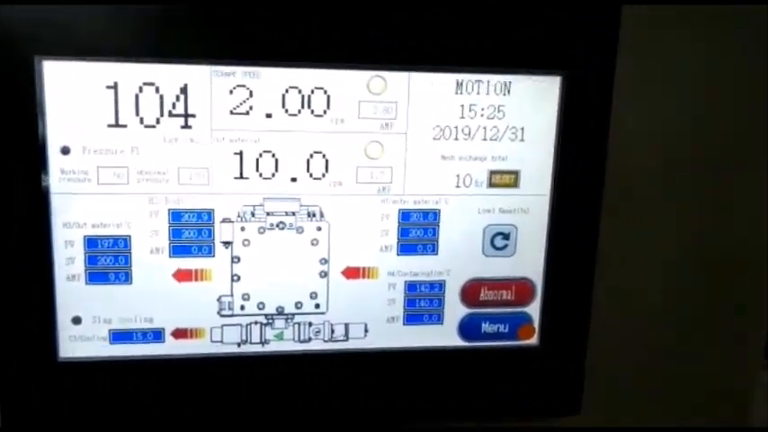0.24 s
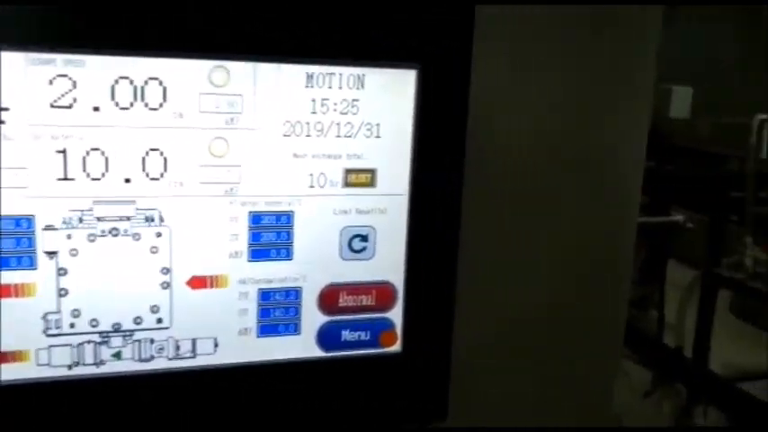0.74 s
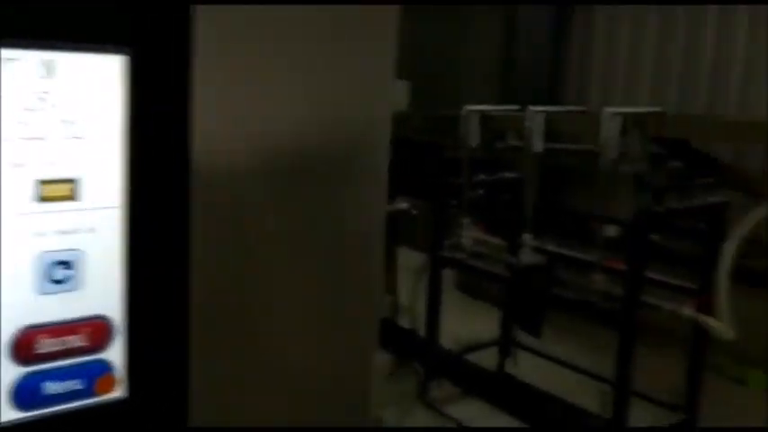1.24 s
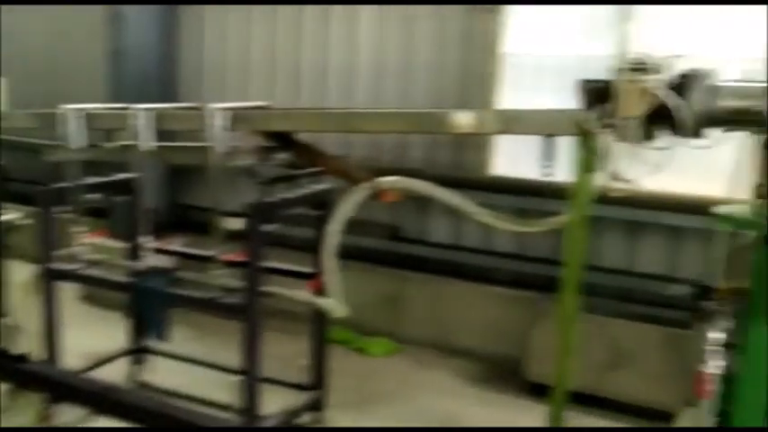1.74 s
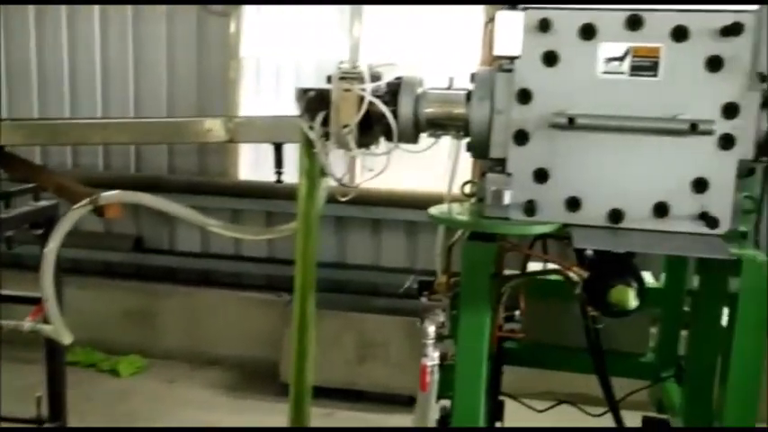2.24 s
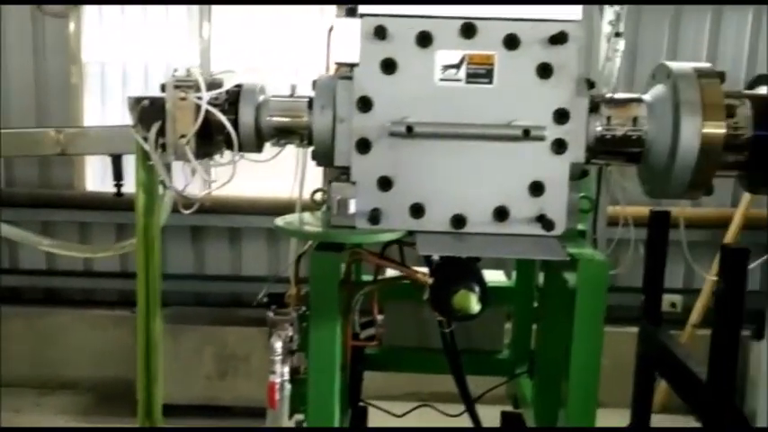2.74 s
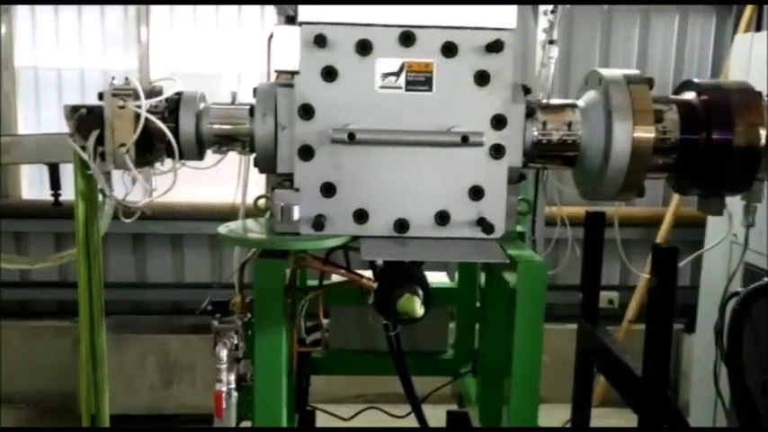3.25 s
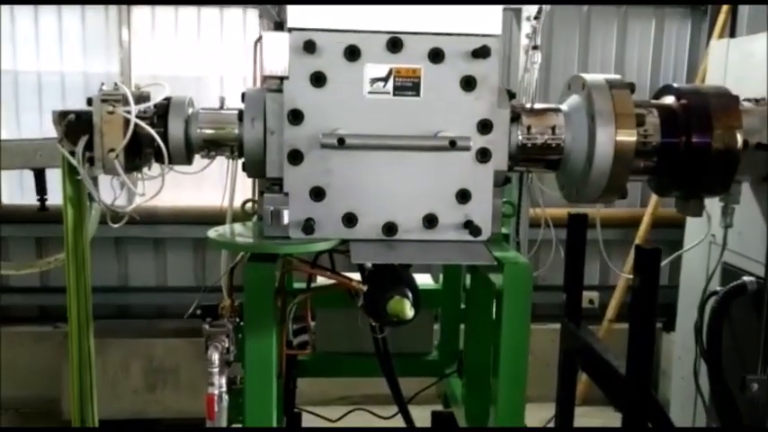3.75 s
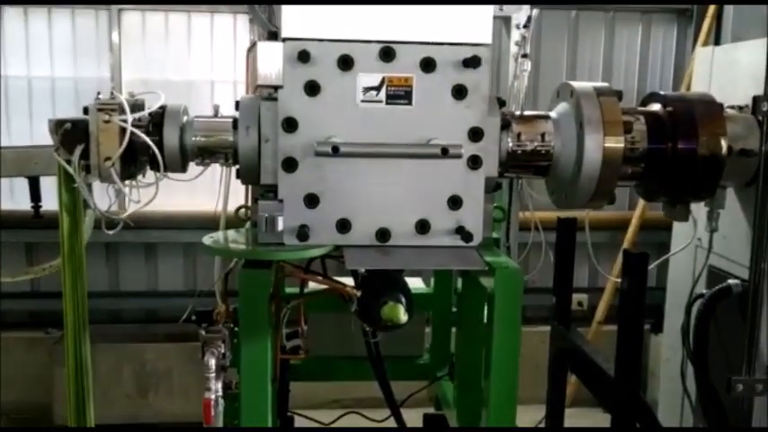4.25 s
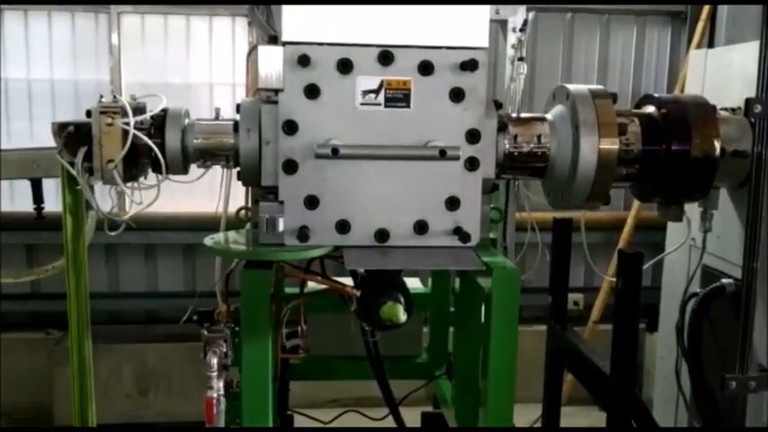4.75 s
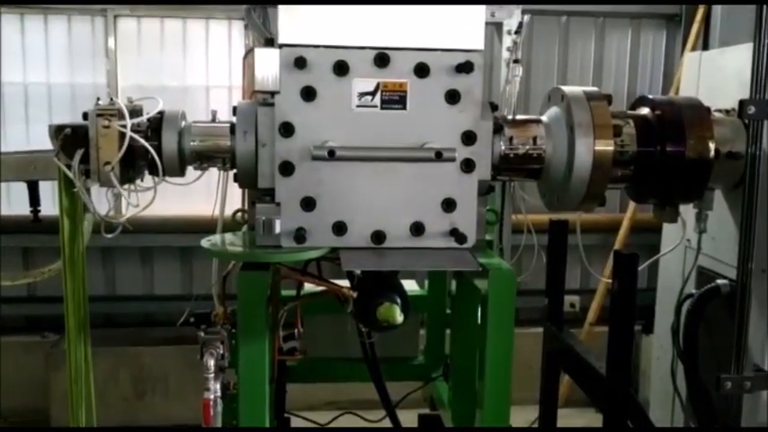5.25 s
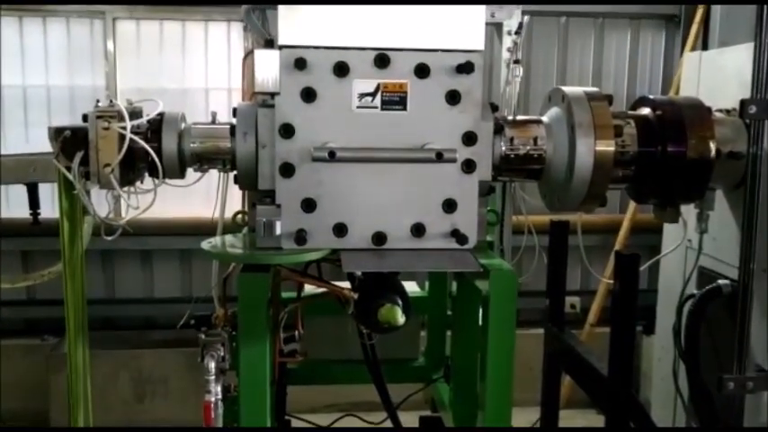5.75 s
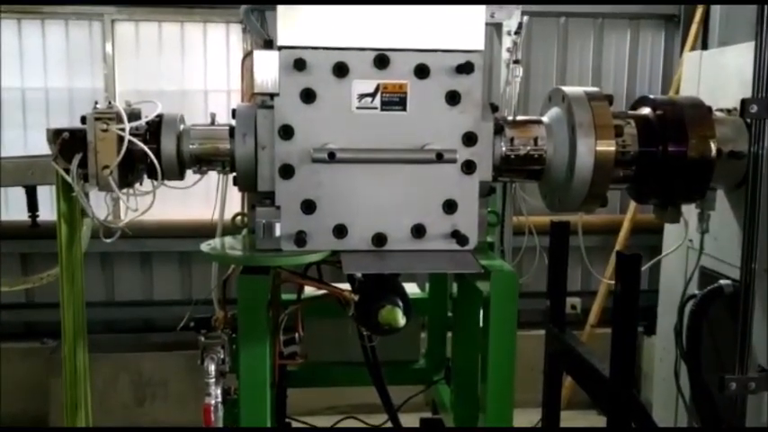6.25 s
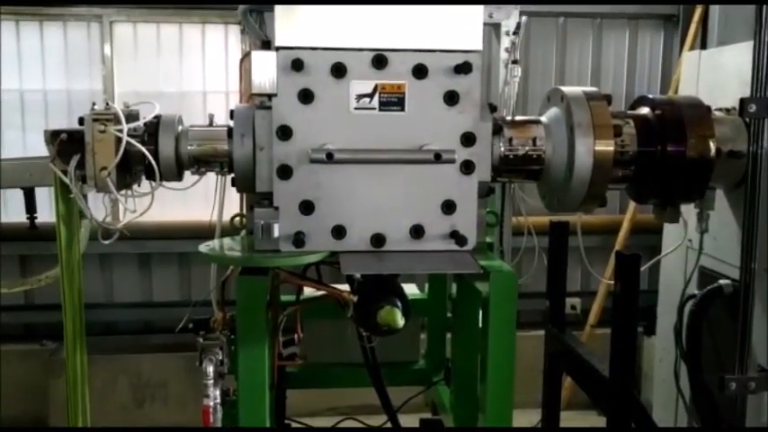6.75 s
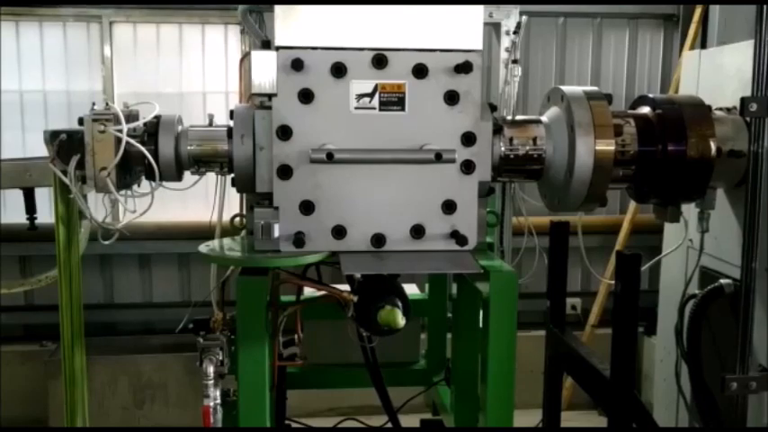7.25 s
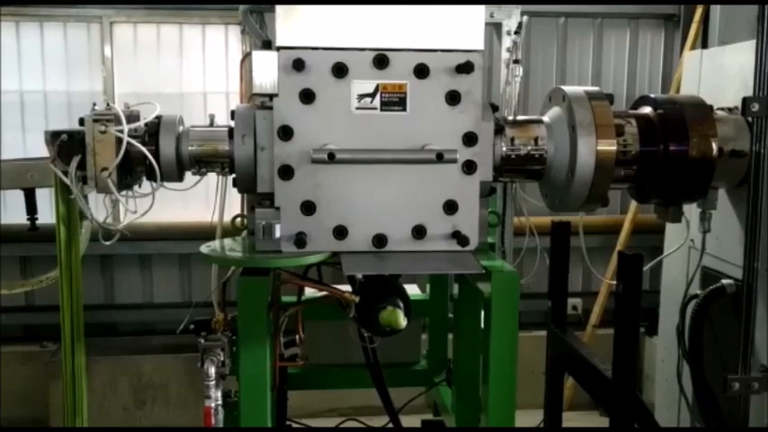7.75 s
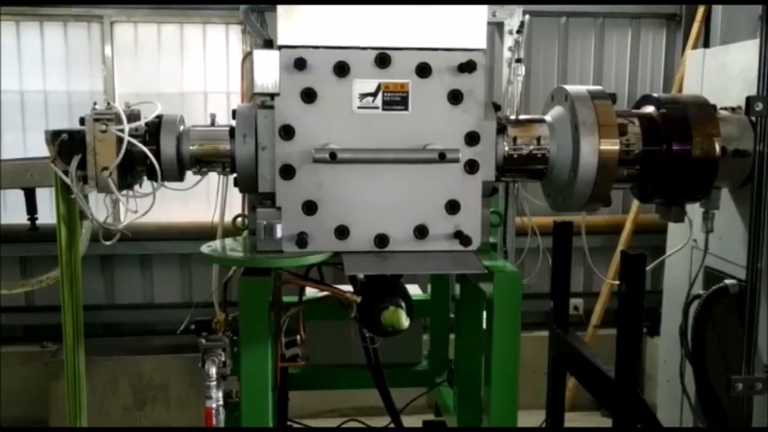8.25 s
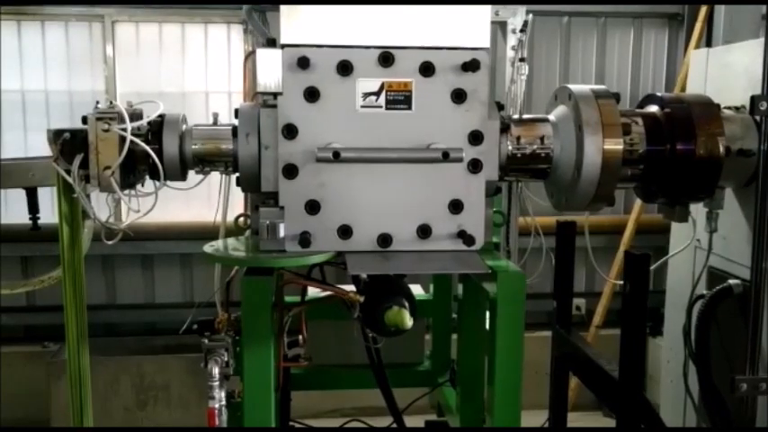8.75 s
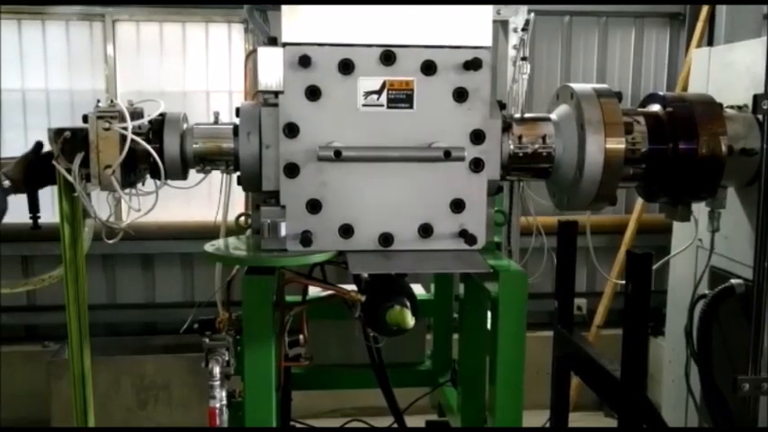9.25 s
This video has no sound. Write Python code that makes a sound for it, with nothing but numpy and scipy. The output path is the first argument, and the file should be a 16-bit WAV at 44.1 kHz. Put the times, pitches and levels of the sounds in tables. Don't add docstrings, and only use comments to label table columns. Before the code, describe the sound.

Dense, steady machine noise from a large screw machine, heard on a handheld stereo phone with thin bass and grainy, watery treble. A shrill electronic whine drifts slightly higher while gear tones flutter and fade separately in each ear. Broad fan and pump roar fills the reverberant hall. A soft air puff comes at about three seconds, another gear whine starts near six, then a sudden cut to silence.

```python
import sys
import numpy as np
from scipy import signal
from scipy.fft import rfft, irfft
from scipy.io import wavfile
from scipy.ndimage import uniform_filter1d

SR = 44100
rng = np.random.default_rng(int(sys.argv[2]) if len(sys.argv) > 2 else 0)


def to_wav(s):
    ch = np.atleast_2d(s).T
    pcm = np.round(np.clip(ch, -1, 1) * 32767)
    wavfile.write(sys.argv[1], SR, pcm.astype(np.int16))


def level_to_linear(level):
    exponent = np.asarray(level, float) / 20
    return 10 ** exponent


N = 419391

# left level in dB, right level in dB, left lead in rad.
HUM_DB_RAD = [
    (-36.5, -33.5, 1.37),
    (-35, -29, 1.18),
]
# time in s, left level in dB, right level in dB, left lead in rad.
MESH_FADES = [(0.0, -27.5, -31, -0.8), (0.7, -31, -42, 0), (1.0, -32.5, -28.5, -1), (1.36, -29, -26, -1),
              (1.55, -39, -33, -2), (1.8, -42, -25.5, -1.5), (1.97, -29, -31, 0.5), (2.12, -40, -41, 4),
              (2.4, -30, -43, -1.8), (3.15, -38, -30, -2.5), (4.0, -28, -30.5, -2.5), (5.0, -39, -41, -7),
              (6.0, -34.5, -31.5, -5.6), (6.4, -34.5, -33, -4), (7.0, -31, -42, -8), (8.25, -34, -25, -3.5),
              (8.75, -36, -31, -9), (9.5, -44, -27, -5)]
# time in s, frequency in Hz.
SECOND_GEAR_HZ = [
    (5.88, 1990),
    (6.0, 2065),
    (6.15, 2094),
    (9.6, 2094),
]
# time in s, left level in dB, right level in dB.
SECOND_GEAR_DB = [
    (5.85, -66, -47),
    (5.95, -39, -34),
    (6.3, -34, -45),
    (7.25, -34, -30),
    (8.0, -29, -33.5),
    (8.75, -49, -28.5),
    (9.5, -20, -34),
]
# frequency in Hz, level in dB, blur in Hz.
FAINT_ORDERS = [(57, -50, 6), (77, -49, 6), (153, -39, 4), (176, -45, 5), (230, -38, 4), (270, -42, 4),
                (345, -43, 6), (405, -47, 3), (633, -49, 2), (692, -46, 3), (982, -48, 2), (1036, -48, 2),
                (1093, -53, 2), (1308, -52, 3), (1324, -52, 2), (1381, -51, 2),
                (2299, -48, 3), (2321, -45, 8), (3930, -56, 2), (3970, -55, 2), (4000, -55, 2),
               (4029, -55, 2), (4070, -56, 2), (4500, -57, 2), (7978, -64, 3), (8018, -64, 3),
               (9355, -66, 20), (11929, -66, 4), (11967, -63, 4), (12029, -68, 4), (12067, -67, 4)]

# time in s, switching rate in Hz, supply rate in Hz, slot ripple in Hz.
DRIVE_HZ = [(0.0, 3084.2, 55.0, 392.4), (0.5, 3102.5, 55.0, 392.8), (1.0, 3113.1, 55.2, 392.8),
            (3.5, 3152.5, 54.7, 391.6), (4.0, 3159.4, 54.0, 386.0), (4.5, 3167.1, 51.7, 370.1),
            (5.5, 3182.7, 47.2, 322.2), (6.0, 3192.9, 49.4, 299.6), (6.5, 3204.8, 48.0, 273.2),
            (7.0, 3221.4, 48.4, 241.3), (8.0, 3254.6, 49.3, 215.8), (9.0, 3292.1, 49.8, 195.9),
            (9.5, 3307.1, 48.8, 188.3)]
# multiple of ripple rate, level in dB.
RIPPLE_LINES = [(1.0, -44), (1.093, -39), (1.16, -44)]
# multiples of supply, ripple and wobble, lower and upper level in dB.
SWITCHING_SIDEBANDS = [(1, 0, -1, -42, -41), (1, 0, 1, -43, -42), (3, 0, 0, -40, -43), (3, 0, -1, -47, -53),
                       (3, 0, 1, -51, -53), (5, 0, 0, -48, -54), (-1, 1, 0, -39, -42), (1, 1, 0, -38, -44),
                       (3, 1, 0, -46, -58), (-3, 1, 0, -49, -55)]
# multiples of ripple and wobble, lower and upper level in dB.
OCTAVE_SIDEBANDS = [(0, 0, -54, -66), (0, 1, -60, -57), (1, -1, -61, -59)]
# time in s, gain in dB.
OCTAVE_SWELL_DB = [(0, 4.5), (.55, 6), (1.1, -1.5), (4.2, 1), (4.8, 6), (5.3, 2.5), (6.2, -1.5), (9.5, -3)]
# time in s, half length in s, left dB, right dB, left lead in rad.
LOWER_SWELLS = [(0.504, 0.17, -22, -24.5, 2), (1.013, 0.3, -21, -20.5, 1), (1.55, 0.11, -33, -23, 3.5),
                (2.063, 0.091, -28, -20.5, 1), (2.58, 0.15, -20, -40, -4), (2.826, 0.11, -26, -27, 0.4),
                (3.5, 0.25, -35, -32, 2.5), (4.15, 0.37, -29, -32, 3.5), (4.5, 0.084, -29.5, -28, -2.5),
                (5.653, 0.27, -24, -29.5, 1.46), (6.45, 0.21, -29, -29, 3.5), (7.25, 0.19, -30.5, -29, 1.7)]
# time in s, half length in s, left dB, right dB, left lead in rad.
UPPER_SWELLS = [(.37, 0.076, -33, -25, 2.5), (.85, 0.4, -30, -34, 0), (1.65, 0.22, -27.5, -35, 1.5),
                (2.4, 0.11, -39, -38, -1.5), (4.0, .13, -25, -29, -2.5), (4.65, 0.25, -26.5, -29.5, 0.8),
                (5.1, 0.2, -31.5, -30.5, 1), (5.5, 0.21, -36, -28, 2), (6.55, .28, -37, -29, 0.6),
                (7.2, 0.17, -30, -33, 1.5), (6.95, 0.17, -34, -34, 1.8), (7.7, 0.12, -40, -55, 0.7),
                (8.6, 0.32, -37, -48, -0.5), (9.3, .2, -37.5, -45, 1.5)]

# frequency in Hz, density in dB per Hz.
ROAR_SPECTRUM = [(20, -30), (45, -5), (70, -6), (160, 2), (400, -0.5), (520, -5.5), (760, -2.5), (1200, -8),
                 (1900, -4), (2400, -0.5), (3300, -7), (4000, -12), (5000, -17), (14500, -45)]
# frequency in Hz, density in dB per Hz.
HISS_SPECTRUM = [(3000, -10), (5000, -8.5), (6400, 0), (8400, -10), (9300, -2.5), (10500, -5.5),
                 (12000, -3.5), (13500, -8), (14500, -15)]
# gain on facing machine in dB, random swell in dB rms, fastest swell in Hz.
ROAR_LAYERS = [
    (1, 2, 2),
    (0, .6, 3),
    (.9, .2, 4),
    (2, .15, 4),
]
# time in s, half length in s, gain in dB.
VENT_PUFF = (3.1, .085, 4.5)
# time in s, half length in s, gain in dB.
FLOOR_THRUM = (6.1, 0.77, 5.4)

# frequency in Hz, correlation 0-1.
MIC_LIKENESS = [(60, 0.9), (130, 0.94), (280, 0.95), (620, 0.62), (1300, 0.38), (2500, 0.26), (6000, 0.036),
                (14000, .05)]
# frequency in Hz, phase in rad.
LEFT_LEAD_RAD = [(20, 0), (300, .1), (690, .3), (1120, 2), (1640, 3)]
# frequency in Hz, left minus right in dB.
LEFT_TILT_DB = [(60, -2.5), (110, 0.5), (200, -3), (370, -1), (670, -2), (1230, -3), (2240, -2.5),
                (4100, 0), (7490, -4.5), (13700, -7)]
# time in s, facing 0-1.
FACING_MACHINE = [
    (0, 0),
    (1.12, .03),
    (1.33, .3),
    (2.15, .4),
    (2.8, 1),
    (9.5, 1),
]
# frequency in Hz, gain in dB.
CASE_DB = [(15, -29), (30, -19), (48, -0.5), (6500, 1.5), (7000, -0.5), (7700, -2), (8300, 3.5), (8900, 2)]
# frequency in Hz, threshold against usual level in dB.
THIN_DB = [(4300, -16), (5000, -9), (6600, -11), (7000, 4), (7600, 6.5), (8400, 4.5), (8900, -10),
           (12500, -7), (13500, -3), (14300, 3)]


def gears():
    facing, = curves(FACING_MACHINE)
    hum = [cabinet + (machine - cabinet) * facing for cabinet, machine in zip(*HUM_DB_RAD)]
    second_hz, = curves(SECOND_GEAR_HZ)
    second_lead_rad = 0.88
    tones = gear(*hum, 921.2, flutter=0.15)
    tones = tones + gear(*curves(MESH_FADES), 2073, flutter=0.33)
    tones = tones + gear(*curves(SECOND_GEAR_DB), second_lead_rad, second_hz, flutter=0.38)
    fan_db = np.maximum(-35.5 - 45 * facing, -44.5)
    fan = faint(654, fan_db, 2, steady=3.5)
    orders = sum(faint(*row) for row in FAINT_ORDERS)
    return tones.real + fan + orders


def gear(left_db, right_db, lead_rad, hz, flutter, blur_hz=15):
    left = level_to_linear(left_db) * np.exp(1j * lead_rad)
    gain = np.array([left, level_to_linear(right_db) + 0j]).reshape(2, -1)
    reflections = 1 + flutter * fading(blur_hz, 0.25, 0)
    return gain * turn(hz) * reflections / np.hypot(1, flutter)


def whine():
    switching, supply, ripple = curves(DRIVE_HZ)
    wobble = 0.093 * ripple
    facing, = curves(FACING_MACHINE)
    octave_db, = curves(OCTAVE_SWELL_DB)
    load_db = 10.5 * np.log2(ripple / ripple[0])
    pair_db = -31 - 1.18 * np.arange(N) / SR
    shield_db = 4 * (facing - 1)
    out = np.zeros((2, N))
    for multiple, db in RIPPLE_LINES:
        out += faint(multiple * ripple, db + 3 * load_db + shield_db, 3, steady=3.0)
    for sign, rows in ((-1, LOWER_SWELLS), (1, UPPER_SWELLS)):
        pair_hz = switching + sign * supply
        out += swells(rows, pair_hz)
        out += faint(pair_hz, pair_db, 6.5, steady=0.55)
        for a, b, c, *level_db in SWITCHING_SIDEBANDS:
            offset = a * supply + b * ripple + c * wobble
            db = level_db[sign > 0] + (b + 1) / 2 * load_db
            out += faint(switching + sign * offset, db, 6, steady=0.6)
        for b, c, *level_db in OCTAVE_SIDEBANDS:
            offset = b * ripple + c * wobble
            out += faint(2 * switching + sign * offset, level_db[sign > 0] + octave_db, 9, steady=1.6)
    return out


def swells(rows, hz):
    s, half_s, left_db, right_db, lead_rad = np.transpose(rows)[..., None]
    t = np.arange(0, N / SR + 0.01, 0.01)
    bumps = np.exp(-((t - s) / half_s) ** 2)
    left = (level_to_linear(left_db) * np.exp(1j * lead_rad) * bumps).sum(0)
    right = (level_to_linear(right_db) * bumps).sum(0)
    gain = np.array([np.interp(np.arange(N) / SR, t, side) for side in (left, right)])
    return (gain * gear(0, 0, 0, hz, flutter=0.4, blur_hz=16)).real


def faint(hz, db, blur_hz, steady=0.97):
    middle_hz = np.mean(hz)
    side = level_to_linear(read(LEFT_TILT_DB, middle_hz) / 2 * np.array([[1], [-1]]))
    same = np.clip(read(MIC_LIKENESS, middle_hz), 0, 1)
    return level_to_linear(db) * side * (turn(hz) * fading(blur_hz, same, steady)).real


def turn(hz):
    cycles = np.cumsum(hz * np.ones(N)) / SR + rng.random()
    angle = (2 * np.pi * (cycles % 1)).astype(np.float32)
    return np.sqrt(2) * (np.cos(angle) + 1j * np.sin(angle))


def fading(blur_hz, same, steady):
    step = 256
    z = rng.standard_normal((2, N // step + 2, 2)) @ [1, 1j]
    r = np.exp(-np.pi * blur_hz * step / SR)
    z = evened(signal.lfilter([1], [1, -2 * r, r * r], z))
    z = z + steady * np.exp(2j * np.pi * rng.random((2, 1)))
    z[1] = same * z[0] + np.sqrt(1 - same ** 2) * z[1]
    z = evened(z)[..., None]
    smooth = z[:, :-1] + np.diff(z, axis=1) * np.arange(step) / step
    return smooth.reshape(2, -1)[:, :N]


def roar():
    size, hop = 1024, 256
    frames, hz = N // hop + 5, np.fft.rfftfreq(size, 1 / SR)
    a, b, c, d, patches = rng.standard_normal((frames, len(hz), 5)).T
    patches = evened(uniform_filter1d(uniform_filter1d(patches, 10, 0), 14, 1))

    same = np.clip(read(MIC_LIKENESS, hz), 0, 1)[:, None]
    left = a + 1j * b
    right = same * left + np.sqrt(1 - same ** 2) * (c + 1j * d)
    half_db = read(LEFT_TILT_DB, hz)[:, None] / 2
    lead = np.exp(1j * read(LEFT_LEAD_RAD, hz))[:, None]
    noise = np.array([left * level_to_linear(half_db) * lead, right * level_to_linear(-half_db)])

    t = np.arange(frames) * hop / SR
    facing, = curves(FACING_MACHINE, t)
    *body_db, hiss_db = [turn_db * facing + db * swell(t, top_hz) for turn_db, db, top_hz in ROAR_LAYERS]
    hiss_db += -46.5 + bump_db(VENT_PUFF, t)
    body_db[0] += bump_db(FLOOR_THRUM, t)
    shares = [np.interp(hz, [110, 150, 450, 560], row)
              for row in ([1, 0, 0, 0], [0, 1, 1, 0], [0, 0, 0, 1])]
    swell_db = sum(np.outer(share, db - db.mean()) for share, db in zip(shares, body_db))
    body = evened(level_to_linear(read(ROAR_SPECTRUM, hz)))[:, None] * level_to_linear(swell_db - 20.5)
    air = evened(level_to_linear(read(HISS_SPECTRUM, hz)) * (hz > 2500))[:, None] * level_to_linear(hiss_db + 7)
    field = noise * np.hypot(body, air) * level_to_linear(0.92 * patches)
    return signal.istft(field, nperseg=size, noverlap=size - hop)[1][:, :N] / np.sqrt(size)


def bump_db(event, t):
    s, half_s, db = event
    return db * np.exp(-((t - s) / half_s) ** 2)


def swell(t, top_hz):
    hz = np.geomspace(0.15, top_hz, 20)[:, None]
    sines = np.sin(2 * np.pi * (hz * t + rng.random(hz.shape)))
    return evened((sines / np.sqrt(hz)).sum(0))


def evened(x):
    return x / np.sqrt(np.mean(abs(x) ** 2) + 1e-20)


def read(points, hz):
    f, value = np.transpose(points)
    return np.interp(np.log(hz + 1), np.log(f + 1), value)


def curves(rows, t=None):
    s, *columns = np.transpose(rows)
    if t is None:
        t = np.arange(N) / SR
    return [np.interp(t, s, column) for column in columns]


def scene():
    return gears() + whine() + roar()


def case(x):
    size = 2 ** 19
    gain = level_to_linear(read(CASE_DB, np.fft.rfftfreq(size, 1 / SR)))
    return irfft(rfft(x, size) * gain)[:, :N]


def thin_bands(x):
    size, hop = 2048, 1024
    window = np.sin(np.pi * (np.arange(size) + 0.5) / size)
    hz, t, z = signal.stft(x, SR, window, size, hop)
    band = (hz // 344).astype(int)
    luck = evened(uniform_filter1d(rng.standard_normal((band.max() + 1, len(t))), 2, 1))
    usual = np.sqrt(uniform_filter1d((abs(z) ** 2).mean(2), 16))[..., None]
    threshold_db = read(THIN_DB, hz)[:, None] + 6.5 * luck[band]
    kept = abs(z) > usual * level_to_linear(threshold_db)
    kept = kept | (hz < THIN_DB[0][0])[:, None]
    return signal.istft(z * kept, SR, window, size, hop)[1][:, :N]


def low_pass(x):
    return signal.sosfilt(signal.butter(12, 14300, fs=SR, output="sos"), x)


def record(dry):
    stop_s = 9.4575
    mix = thin_bands(case(dry)) * (np.arange(N) < stop_s * SR)
    return low_pass(mix)


dry = scene()
out = record(dry)
to_wav(out)
```